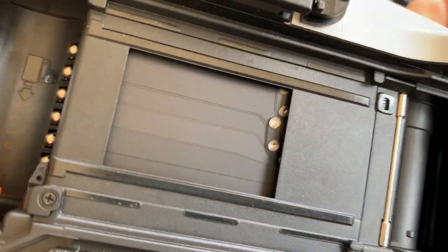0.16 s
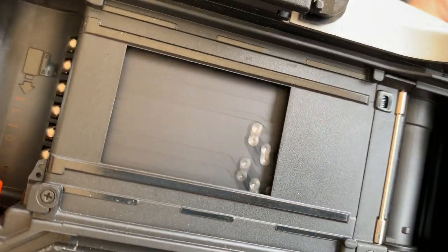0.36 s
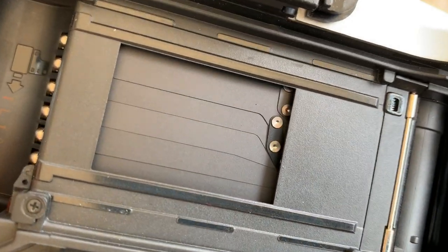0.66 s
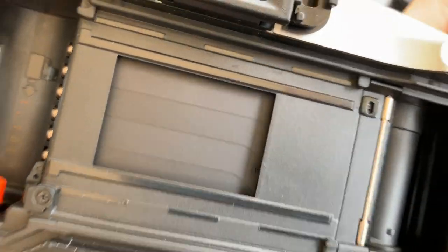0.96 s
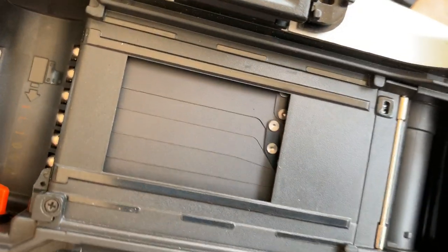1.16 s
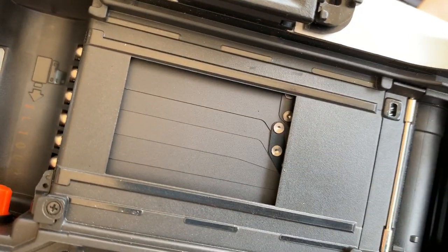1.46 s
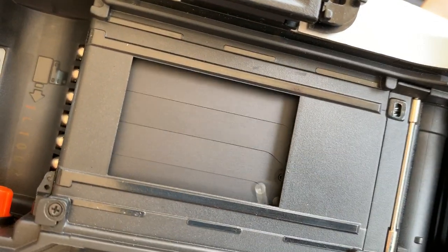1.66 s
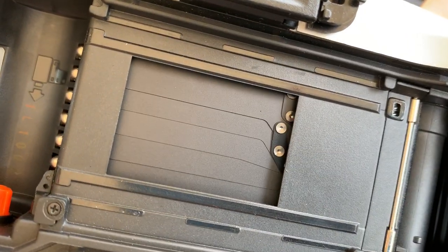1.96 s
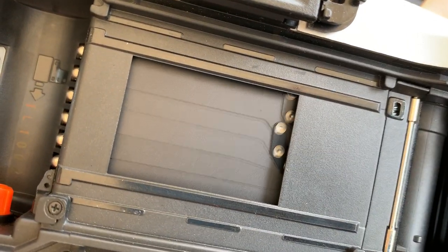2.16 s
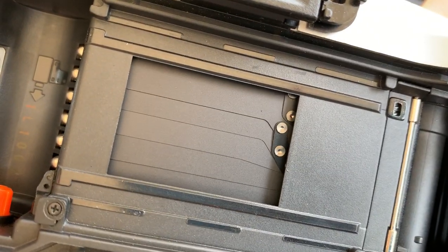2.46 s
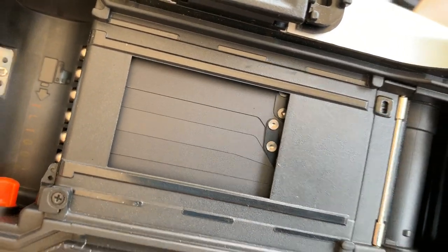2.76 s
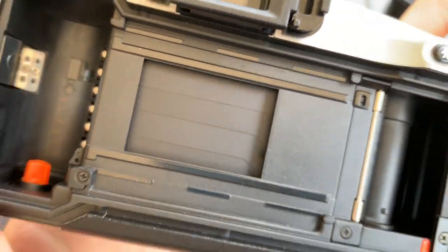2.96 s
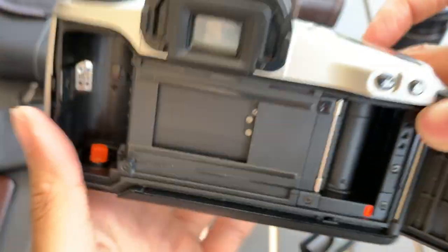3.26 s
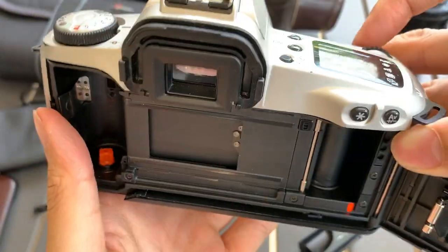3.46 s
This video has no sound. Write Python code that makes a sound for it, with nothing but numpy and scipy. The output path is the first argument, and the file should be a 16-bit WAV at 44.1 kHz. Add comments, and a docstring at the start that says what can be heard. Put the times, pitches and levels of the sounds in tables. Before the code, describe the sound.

A motorised film camera fires five times at a steady pace, each crisp double clack followed by a short rising gear whine and tiny latch clicks, close to one microphone in a quiet room.

```python
"""A motorised film camera with its back open fires five times, close to one microphone in a quiet room.
Each cycle: the motor twitches, the mirror slaps up, the shutter blades snap, the mirror drops,
then the motor whirs up to speed and recocks the works through a few latch clicks.
Contacts are random rattles ringing coloured parts; the motor is gear tones with shaped noise.
A faint thin squeal follows the first cycle; the body ticks and rubs a little in the hand."""
import sys
import numpy as np
from scipy import signal
from scipy.fft import rfft, irfft, next_fast_len
from scipy.io import wavfile
from scipy.ndimage import map_coordinates

SR = 44100
rng = np.random.default_rng(int(sys.argv[2]) if len(sys.argv) > 2 else 0)


def output_pcm(signal):
    """Save a mono or channel-first signal as 16-bit PCM at the path in sys.argv[1].

    Samples are clipped to [-1, 1] before scaling.
    """
    pcm = np.clip(np.atleast_2d(signal).T, -1, 1) * 32767
    wavfile.write(sys.argv[1], SR, np.round(pcm).astype(np.int16))


N = 158760  # samples, 3.6 s
LENGTH = 8192  # samples in a contact's force and in a part's response


def amp(db):
    """Decibels to gain."""
    return 10 ** (np.asarray(db) / 20)


def unit(x):
    """Scale to rms 1."""
    return x / np.sqrt(np.mean(x ** 2) + 1e-20)


def norm(x):
    """Scale to energy 1."""
    return x / (np.linalg.norm(x) + 1e-20)


def along(points, hz):
    """Read a (frequency, value) curve at hz, on a log frequency axis."""
    point_hz, value = np.transpose(points)
    return np.interp(np.log(hz + 1), np.log(point_hz + 1), value)


def add(out, start_s, x):
    """Mix x into out at start_s."""
    i = max(round(start_s * SR), 0)
    out[i:i + len(x)] += x[:len(out) - i]


def wobble(rate, size):
    """A smooth random curve with rate knots a second."""
    knots = rng.standard_normal(size // 8)
    return map_coordinates(knots, [np.arange(size) * rate / SR], mode="wrap")


def noise(colour, size):
    """Random noise shaped to a colour, at rms 1."""
    gain = amp(along(colour, np.fft.rfftfreq(size, 1 / SR)))
    return unit(irfft(rfft(rng.standard_normal(size)) * gain, size))


# Steady rumble and hiss of the place. Columns: pitch_hz [Hz], level_db [dB, relative]
FLOOR_COLOUR = [(13, -35), (22, -0.5), (76, -3), (152, -11.5), (356, -15), (672, -18.5), (837, -20),
                (1230, -23), (1860, -28), (2590, -28), (3320, -31.5), (6100, -39), (7000, -39.5),
                (16000, -48.5)]
FLOOR_DB = -56
# Hum tones. Columns: pitch_hz [Hz], level_db [dB rms]
HUM_TONES = [(48.4, -63), (96.9, -68.5), (226.1, -70), (349.9, -77)]


def room_tone():
    """Low rumble and hiss, with hum tones whose phases drift slightly."""
    t = np.arange(N) / SR
    hum = np.zeros(N)
    for pitch_hz, level_db in HUM_TONES:
        phase = 2 * np.pi * pitch_hz * t + .6 * wobble(5, N)
        hum += amp(level_db) * np.sqrt(2) * np.sin(phase)
    return amp(FLOOR_DB) * noise(FLOOR_COLOUR, N) + hum


# Motor runs in a cycle. Columns: start_s [s after the snap], length_s [s], spin_up_s [s, time constant]
MOTOR_RUNS = [(-.064, 0.034, .042), (0.057, .226, .0245)]
COAST_S = .11  # run-down time constant
LOAD_S, LOAD_SAG, FREE_RISE = .243, 0.017, 0.027  # tightest springs, s after the snap; speed shares


def motor_speed(t, load_width_s=.014, free_s=0.044):
    """Share of top speed: spins up, sags against the springs, runs free, coasts down."""
    speed = np.zeros(len(t))
    ends_s = [MOTOR_RUNS[1][0], np.inf]  # the twitch gives way to the main run
    for (start_s, length_s, spin_up_s), end_s in zip(MOTOR_RUNS, ends_s):
        rise = 1 - np.exp(-np.clip(t - start_s, 0, length_s) / spin_up_s)
        coast = np.exp(-np.maximum(t - start_s - length_s, 0) / COAST_S)
        speed += rise * coast * (t < end_s)
    sag = LOAD_SAG * np.exp(-((t - LOAD_S) / load_width_s) ** 2)
    release = FREE_RISE * np.clip((t - LOAD_S) / free_s, 0, 1)
    return speed * (1 - sag + release)


# How well the housing radiates a tone. Columns: pitch_hz [Hz], level_db [dB]
HOUSING_RESPONSE = [(1500, -10), (2000, -1), (2400, 0), (3000, -1.5), (3800, -5.5), (4600, 0), (5100, -1.5),
                    (6000, -7.5), (6700, 1.5), (7400, 1), (8500, -1), (12000, 1)]
MESH_HZ = 2420  # gear mesh rate at a speed share of 1
JITTER, FLUTTER_DB = 0.0075, 1.5  # random swing of each tone's speed (share) and level


def gear_tones(tones, speed):
    """Tones tied to the motor speed, each roughened by the play of the teeth."""
    size = len(speed)
    out = np.zeros(size)
    for multiple, level_db in tones:
        radiated_db = along(HOUSING_RESPONSE, multiple * MESH_HZ * np.abs(speed))
        gain = amp(level_db + radiated_db + FLUTTER_DB * wobble(230, size))
        mesh_hz = MESH_HZ * speed * (1 + JITTER * wobble(900, size))
        phase = 2 * np.pi * np.cumsum(mesh_hz) / SR
        out += gain * np.sqrt(2) * np.sin(multiple * phase)
    return out


# Camera releases. Columns: start_s [s, shutter snap], level_db [dB, contacts only], speed_ratio [motor]
RELEASES = [(0.1728, -0.8, 1.0), (0.8413, -.5, 1.0), (1.5092, 0.5, .996), (2.1781, 0.3, 1.0),
            (2.8457, 0.4, 1.013)]
# Motor levels through a cycle.
# Columns: time_s [s after the snap], whine_db [dB], overtones_db [dB], gear_noise_db [dB]
MOTOR_LEVELS = [(-.066, -88, -98, -90), (-.062, -72.5, -83, -60), (-.054, -70.5, -73, -55.5),
                (-.04, -68, -55, -54.5), (-.026, -59.5, -53.5, -49), (0, -76, -66.5, -41),
                (.06, -73.5, -69, -52.5), (.095, -58, -57, -47), (.116, -48.5, -57.5, -52),
                (.136, -42.5, -52.5, -48.5), (.2, -42, -55.5, -46), (.28, -40, -53.5, -51),
                (.308, -52, -75, -50.5), (.33, -70, -85, -59.5), (0.372, -97, -90, -73.5)]
# Gear tones. Columns: multiple [of the mesh rate], level_db [dB, relative]
WHINE_TONES = [(1, 0.5), (1.045, -7)]
OVERTONE_TONES = [(2.075, 0.5), (3.045, -7), (3.08, -8), (4.1, -15.5), (5.05, -23.5)]
# Gear noise and brush hiss. Columns: pitch_hz [Hz], level_db [dB, relative]
GEAR_NOISE = [(200, -27), (700, -21.5), (950, -10), (1500, -14), (2100, 1.5), (2500, -1), (3000, -8.5),
              (3700, -22.5), (6000, -24.5), (15000, -40.5)]
BRUSH_HISS = [(1000, -25.5), (3000, -0.5), (4800, -0.5), (6500, -3.5), (8000, -5.5), (10000, -7),
              (15500, -19.5)]
BRUSH_DB = -4.5  # against the gear noise, at a speed share of 1


def motor(rattle_db=2.5, rattle_hz=1100, drift=.0015):
    """Gear whine with overtones, gear rattle in the housing, and brush hiss that grows with speed."""
    out = np.zeros(N)
    knots_s, *levels_db = np.transpose(MOTOR_LEVELS)
    size = SR // 2
    t = knots_s[0] + np.arange(size) / SR
    whine_gain, overtone_gain, gear_gain = [amp(np.interp(t, knots_s, db)) for db in levels_db]
    for start_s, _, speed_ratio in RELEASES:
        speed = speed_ratio * motor_speed(t) * (1 + drift * wobble(30, size))
        brushes = amp(BRUSH_DB) * speed * noise(BRUSH_HISS, size)
        gears = noise(GEAR_NOISE, size) + brushes
        rattle = gears * amp(rattle_db * wobble(rattle_hz, size))
        whine = whine_gain * gear_tones(WHINE_TONES, speed)
        overtones = overtone_gain * gear_tones(OVERTONE_TONES, speed)
        add(out, start_s + t[0], whine + overtones + gear_gain * rattle)
    return out


def causal(colour):
    """Shortest impulse response with this colour: minimum phase, from the folded cepstrum."""
    cepstrum = irfft(np.log(amp(along(colour, np.fft.rfftfreq(LENGTH, 1 / SR)))))
    cepstrum[1:LENGTH // 2] *= 2
    cepstrum[LENGTH // 2 + 1:] = 0
    return irfft(np.exp(rfft(cepstrum)))


def chatter(grain, envelope):
    """Contact force: a brief random rattle under an envelope, roughly even across frequency."""
    force = grain * envelope
    for _ in range(3):
        spectrum = rfft(force)
        flat = irfft(spectrum / (np.abs(spectrum) + 1e-9))
        force = flat * np.sqrt(envelope)
    return norm(force)


def ringing(modes):
    """A part's decaying tones, each struck at a slightly different level every time."""
    t = np.arange(LENGTH) / SR
    ring = np.zeros(LENGTH)
    for pitch_hz, level_db, t60_s in modes:
        tone = np.cos(2 * np.pi * pitch_hz * t) * amp(-60 * t / t60_s)
        ring += amp(level_db + rng.normal(0, 1.2)) * norm(tone)
    return ring


SAME_SHARE = .75  # power share of a contact's random grain that repeats from cycle to cycle


def strikes(times, contacts, colour, modes):
    """Each contact rattles a part, much alike every time, and leaves any modes ringing."""
    out, t = np.zeros(N), np.arange(LENGTH) / SR
    body = norm(causal(colour))
    for delay_s, contact_db, attack_s, hold_s, t60_s in contacts:
        decay = amp(-60 * np.maximum(t - attack_s - hold_s, 0) / t60_s)
        envelope = np.clip(t / attack_s, 0, 1) ** 2 * decay
        habit = rng.standard_normal(LENGTH)
        for start_s, level_db in times:
            fresh = rng.standard_normal(LENGTH)
            grain = np.sqrt(SAME_SHARE) * habit + np.sqrt(1 - SAME_SHARE) * fresh
            force = chatter(grain, envelope)
            sound = norm(signal.fftconvolve(force, body + ringing(modes)))
            add(out, start_s + delay_s, amp(contact_db + level_db) * sound)
    return out


def every_cycle(contacts, colour, modes):
    """The same contacts struck at every release, at that release's level."""
    times = [(start_s, level_db) for start_s, level_db, _ in RELEASES]
    return strikes(times, contacts, colour, modes)


# Gears meeting as the motor starts; t60_s shapes the envelope that starts the rattle.
# Columns: delay_s [s after the snap], level_db [dB energy], attack_s [s], hold_s [s], t60_s [s]
SLACK_CONTACTS = [(-0.034, -25.5, .001, 0.0042, 0.041)]


def gear_slack():
    """The gears take up their slack as the motor starts, coloured like the gear noise."""
    return every_cycle(SLACK_CONTACTS, GEAR_NOISE, [])


# Mirror hitting its upper stop.
# Columns: delay_s [s after the snap], level_db [dB energy], attack_s [s], hold_s [s], t60_s [s]
MIRROR_UP_CONTACTS = [(-.0234, 3, .0015, 0.003, .013), (-.018, -10.5, 0.00086, .004, .015),
                      (-.0098, -9, .001, 0.0026, .008)]
# Its colour. Columns: pitch_hz [Hz], level_db [dB, relative]
MIRROR_UP_COLOUR = [(180, -62.5), (300, -34), (455, -42), (1300, -12.5), (1640, -5), (2100, 2),
                    (2570, -9.5), (3130, 5.5), (3760, -13.5), (4440, -0.5), (5160, -13.5), (8220, -10),
                    (9240, -12.5), (10000, -8.5), (11700, -21), (13500, -21), (16000, -32.5)]
# Ringing of the mirror box. Columns: pitch_hz [Hz], level_db [dB energy against the body], t60_s [s]
MIRROR_BOX_MODES = [(1136, -28.5, .06), (1358, -20.5, 0.048), (1770, -22.5, 0.045), (2028, -22, 0.062),
                    (2300, -10, .04), (3080, -27.5, .03), (3830, -21, .06), (4500, -18.5, 0.017)]


def mirror_up():
    """The mirror slaps up and rings its box."""
    return every_cycle(MIRROR_UP_CONTACTS, MIRROR_UP_COLOUR, MIRROR_BOX_MODES)


# Shutter blades snapping.
# Columns: delay_s [s after the snap], level_db [dB energy], attack_s [s], hold_s [s], t60_s [s]
SHUTTER_CONTACTS = [(0, 9, 0.00083, 0.0022, 0.021), (0.0091, -6, .001, 0.0012, .03),
                    (.029, -10.5, .001, .003, .05)]
# Their colour. Columns: pitch_hz [Hz], level_db [dB, relative]
SNAP_COLOUR = [(100, -39.5), (300, -12.5), (500, -8), (690, -6.5), (800, -18), (910, -18.5), (1000, -2),
               (1250, -5.5), (1400, -0.5), (1800, -7.5), (2050, 14), (2400, 8), (2800, -4), (4400, 2.5),
               (6900, -10), (7800, 12), (8600, -8.5), (9600, 4), (11200, -13.5), (15000, -8.5),
               (16000, -25.5)]
# Ringing of the blades. Columns: pitch_hz [Hz], level_db [dB energy against the body], t60_s [s]
BLADE_MODES = [(698, -23.5, 0.057), (1972, -10.5, 0.056), (2595, -22, .06), (4620, -30.5, .05),
               (5270, -31, .08), (5922, -28, .05), (7574, -25.5, .12), (7220, -28, 0.058), (9550, -31, .04)]


def shutter():
    """The shutter blades snap and ring thinly."""
    return every_cycle(SHUTTER_CONTACTS, SNAP_COLOUR, BLADE_MODES)


# Mirror landing.
# Columns: delay_s [s after the snap], level_db [dB energy], attack_s [s], hold_s [s], t60_s [s]
MIRROR_DOWN_CONTACTS = [(.039, -2, 0.00063, 0.0027, 0.012), (.0415, 3, 0.00081, 0.0028, 0.0091),
                        (.05, -21.5, 0.0012, 0.0022, 0.036)]
# Its colour. Columns: pitch_hz [Hz], level_db [dB, relative]
MIRROR_DOWN_COLOUR = [(100, -17.5), (300, -18.5), (430, -19.5), (650, 0.5), (780, -9.5), (1000, 5),
                      (1110, 3.5), (1210, -11), (1390, -1), (1620, -12.5), (1800, -4.5), (2100, 2),
                      (2290, 6), (2580, -7), (2950, -3), (3600, -6.5), (3950, 4.5), (4400, -7), (5100, -1),
                      (6300, -14.5), (8000, -11.5), (12000, -14.5), (16000, -24)]


def mirror_down():
    """The mirror drops back and rings the same box."""
    return every_cycle(MIRROR_DOWN_CONTACTS, MIRROR_DOWN_COLOUR, MIRROR_BOX_MODES)


# Cocking latches.
# Columns: delay_s [s after the snap], level_db [dB energy], attack_s [s], hold_s [s], t60_s [s]
LATCH_CONTACTS = [(0.243, -14.5, 0.00075, 0.0027, 0.032), (0.2495, -13.5, .0006, .002, .025),
                  (0.259, -12.5, .0006, .003, 0.039), (0.29, -14.5, 0.00053, 0.0027, 0.025),
                  (.302, -27, 0.00043, 0.0014, .02)]
# Their colour. Columns: pitch_hz [Hz], level_db [dB, relative]
LATCH_CLICK_COLOUR = [(300, -20), (700, -21.5), (1000, 2), (1250, -3.5), (2200, 4.5), (3200, 6),
                      (3800, -3.5), (4600, 4), (5900, 2), (6700, -10), (8500, -2), (11000, -9.5),
                      (15500, -18.5)]


def latches():
    """Latches click as the works recock, with no ringing modes."""
    return every_cycle(LATCH_CONTACTS, LATCH_CLICK_COLOUR, [])


# Thin squeal in two tones. Columns: start_s [s], length_s [s], first_hz [Hz], last_hz [Hz],
# glide_s [s, time constant], waver [share of pitch], level_db [dB peak],
# octave_db [dB against the tone], attack_s [s]
SQUEAL_TONES = [(0.503, .205, 3430, 3334, .11, .004, -58.5, -18, .02),
                (0.556, 0.39, 3150, 2450, .042, 0.021, -57, -29, 0.087)]


def squeal(release_s=0.19, flicker_db=3):
    """Two faint, wavering thin tones that sink in pitch, flicker in level and fade."""
    out, t = np.zeros(N), np.arange(SR // 2) / SR
    for start_s, length_s, first_hz, last_hz, glide_s, waver, level_db, octave_db, attack_s in SQUEAL_TONES:
        pitch_hz = last_hz + (first_hz - last_hz) * np.exp(-t / glide_s)
        phase = 2 * np.pi * np.cumsum(pitch_hz * (1 + waver * wobble(590, len(t)))) / SR
        fade = np.clip((length_s - t) / release_s, 0, 1) ** .5
        envelope = np.clip(t / attack_s, 0, 1) * fade
        gain = amp(level_db + flicker_db * wobble(90, len(t)))
        tone = np.sin(phase) + amp(octave_db) * np.sin(2 * phase)
        add(out, start_s, gain * envelope * tone)
    return out


# Small ticks of the body in the hand.
# Columns: delay_s [s after 0.0015 s], level_db [dB energy, before +0.014], attack_s [s], hold_s [s], t60_s [s]
TICK_CONTACTS = [(.711, -33, 0.00036, .003, 0.022), (3.2232, -22.5, .0005, .001, .014),
                 (3.439, -40, 0.0016, 0.0036, 0.038)]
# Their colour. Columns: pitch_hz [Hz], level_db [dB, relative]
HANDLING_COLOUR = [(300, -22), (1000, -3.5), (1700, -3.5), (2300, 8.5), (3200, -3), (4600, 1), (6000, -4.5),
                   (7000, -6), (8500, -9), (11000, -20.5), (16000, -25)]


def handling_ticks():
    """The body ticks a little in the hand: brief dry contacts."""
    return strikes([(0.0015, 0.014)], TICK_CONTACTS, HANDLING_COLOUR, [])


# Soft rub of the hand on the body.
# Columns: delay_s [s after 0.0073 s], level_db [dB energy], attack_s [s], hold_s [s], t60_s [s]
RUB_CONTACTS = [(3.262, -29, .02, .02, 0.16)]
# Its colour. Columns: pitch_hz [Hz], level_db [dB, relative]
HAND_COLOUR = [(300, -24), (720, -7), (850, -2.5), (1000, -29), (2600, -14), (6000, -29), (16000, -51)]


def hand_rub():
    """The hand rubs the body softly: a slower, duller contact."""
    return strikes([(0.0073, 0)], RUB_CONTACTS, HAND_COLOUR, [])


# Echoes off near surfaces. Columns: delay_s [s], level_db [dB against the direct sound]
NEAR_WALLS = [(.0034, -20.5), (.0079, -25)]


def near_walls(x):
    """Single delayed, weaker copies from the near surfaces."""
    return sum(amp(level_db) * np.pad(x, (round(delay_s * SR), 0))[:N] for delay_s, level_db in NEAR_WALLS)


# Decay of the room. Columns: pitch_hz [Hz], t60_s [s]
ROOM_DECAY = [(200, 0.39), (2300, 0.097), (8000, 0.17), (15000, 0.047)]
ROOM_DB = -15  # tail energy against the direct sound


def room(x):
    """A short tail of decaying noise; the lows linger longest."""
    hz, t, spectrum = signal.stft(rng.standard_normal(SR // 2), SR, nperseg=256)
    decay = amp(-60 * t / along(ROOM_DECAY, hz)[:, None])
    tail = signal.istft(spectrum * decay, SR, nperseg=256)[1]
    onset = np.clip(np.arange(len(tail)) / SR / 0.00067, 0, 1)
    return amp(ROOM_DB) * signal.fftconvolve(x, norm(tail * onset))[:N]


def scene():
    """The camera close by, its room and the room's own tone, on one channel."""
    contacts = gear_slack() + mirror_up() + shutter() + mirror_down() + latches()
    handling = handling_ticks() + hand_rub()
    camera = motor() + contacts + squeal() + handling
    return (camera + near_walls(camera) + room(camera) + room_tone())[None]


TOP_HZ = 15900  # the recorder's band limit


def record(dry):
    """The recorder keeps nothing above its band limit."""
    size = next_fast_len(N + SR // 2)
    in_band = np.fft.rfftfreq(size, 1 / SR) < TOP_HZ
    return irfft(rfft(dry, size) * in_band, size)[..., :N]


dry = scene()
out = record(dry)
output_pcm(out)
```